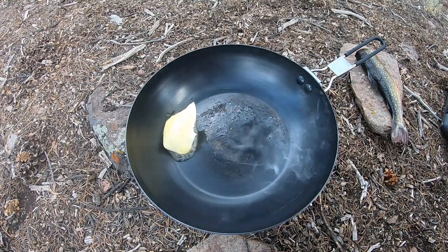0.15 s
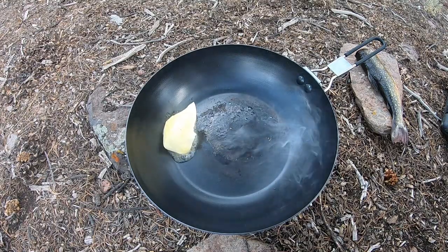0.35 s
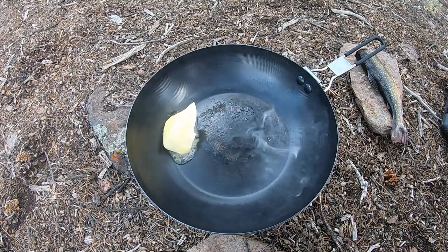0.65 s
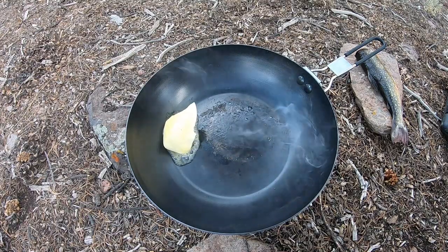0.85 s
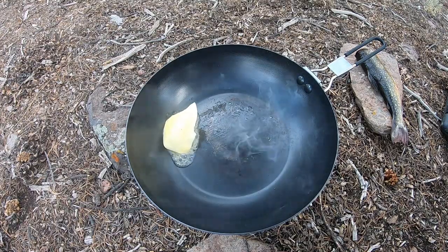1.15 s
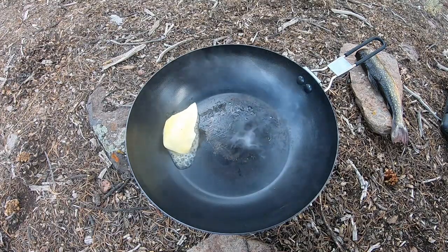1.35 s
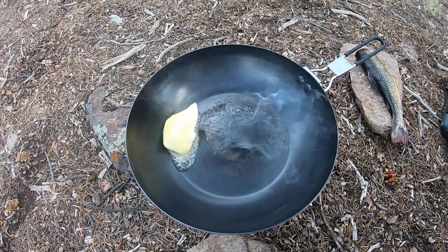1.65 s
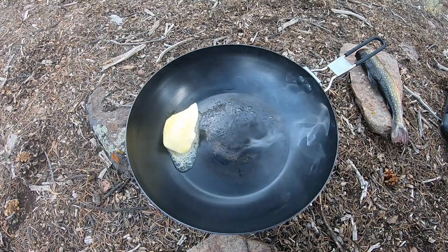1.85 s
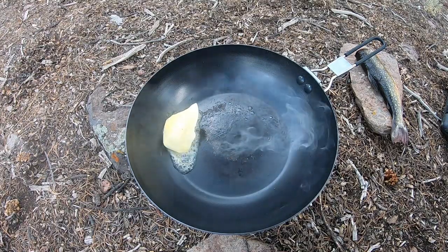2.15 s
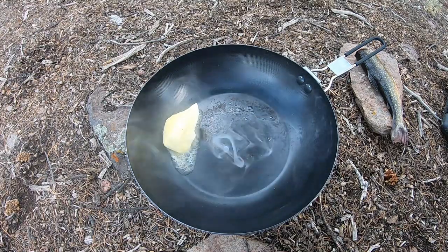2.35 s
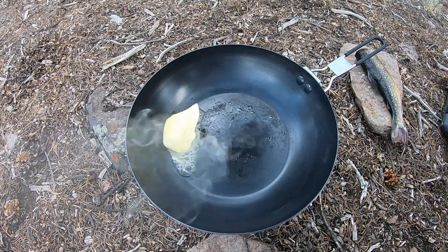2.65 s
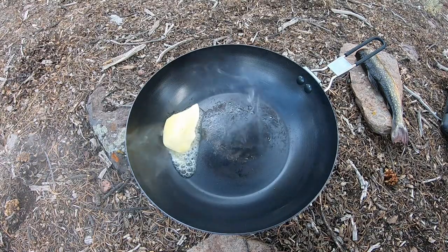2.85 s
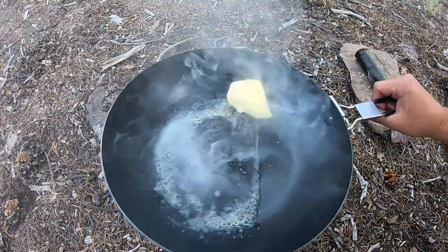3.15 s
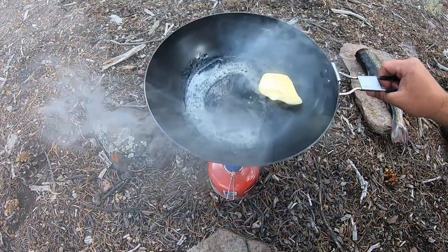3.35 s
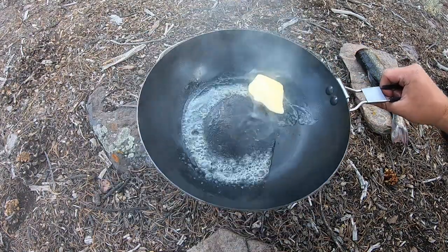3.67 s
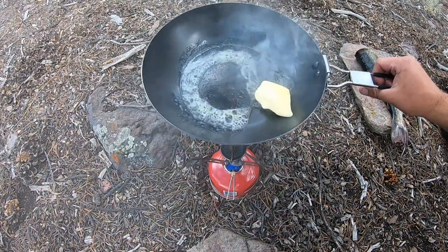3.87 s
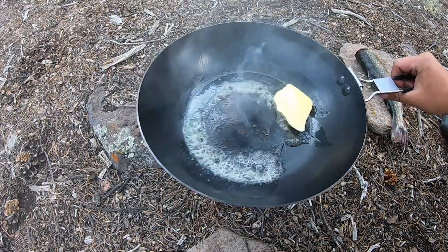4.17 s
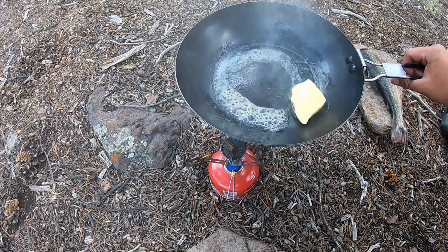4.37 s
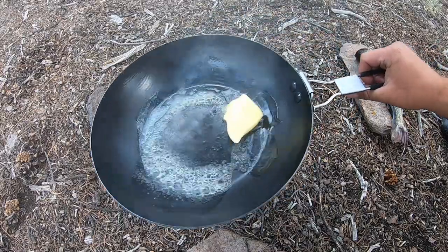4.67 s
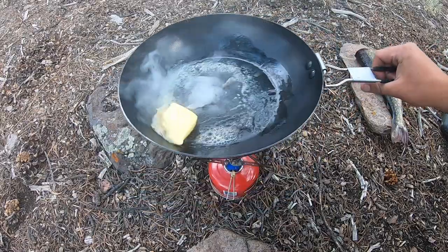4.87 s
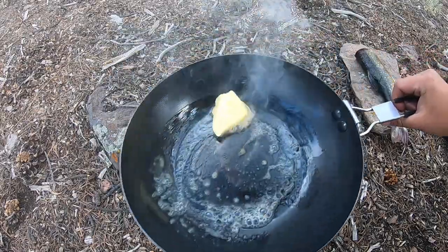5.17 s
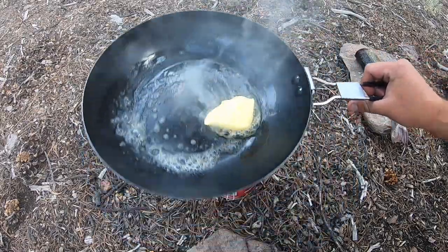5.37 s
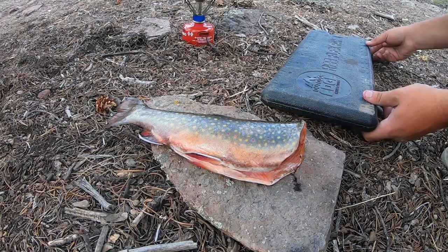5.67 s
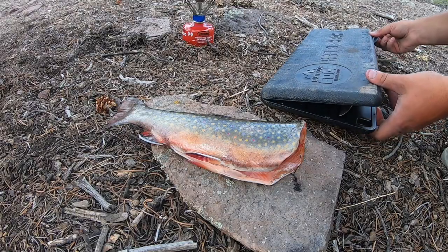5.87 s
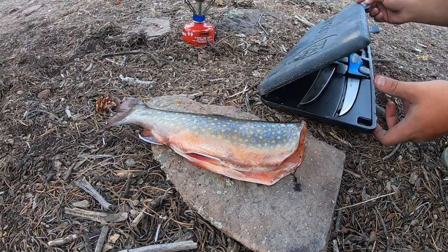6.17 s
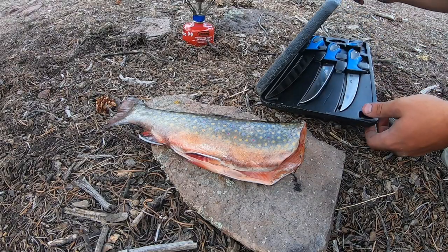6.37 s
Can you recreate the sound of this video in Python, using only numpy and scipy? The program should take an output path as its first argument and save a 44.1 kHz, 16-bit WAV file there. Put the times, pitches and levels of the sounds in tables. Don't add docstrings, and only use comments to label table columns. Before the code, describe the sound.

Butter sizzles crisply in a steel pan outdoors, foams louder as it is swirled, knocks and clangs on a burner, then a case snaps open over distant frying.

```python
import sys
import numpy as np
from scipy import signal
from scipy.io import wavfile

SR = 44100
rng = np.random.default_rng(int(sys.argv[2]) if len(sys.argv) > 2 else 0)


def generate_wav(signal):
    frames = np.transpose(np.atleast_2d(signal))
    scaled = np.clip(frames, -1, 1) * 32767
    pcm = np.round(scaled).astype(np.int16)
    wavfile.write(sys.argv[1], SR, pcm)


def level_to_linear(level):
    exponent = np.asarray(level, float) / 20
    return 10 ** exponent


N = 287281
LIFT_S, CUT_S = 2.962, 5.677


def rms_one(x):
    return x / np.sqrt(np.mean(x ** 2) + 1e-20)


def in_time(rows):
    s, *columns = np.transpose(rows)
    return [np.interp(np.arange(N) / SR, s, c) for c in columns]


def at_hz(points, hz):
    f, db = np.transpose(points)
    return np.interp(np.log(hz), np.log(f), db)


def drift(rate):
    r = np.exp(-80 * np.pi * rate / SR)
    noise = rng.standard_normal(N // 40 + 2002)
    slow = signal.lfilter([1], [1, -2 * r, r * r], noise)[2000:]
    return np.interp(np.arange(N) / 40, np.arange(len(slow)), rms_one(slow))


def band(x, low_hz, high_hz, order=2):
    return signal.sosfilt(signal.butter(order, [low_hz, high_hz], "band", fs=SR, output="sos"), x)


def fade(at_s, length_s):
    return np.clip((np.arange(N) / SR - at_s) / length_s + .5, 0, 1)


def ring(clicks, hz, t60):
    r, w = level_to_linear(-60 / (t60 * SR)), 2 * np.pi * hz / SR
    return signal.lfilter([0, np.sin(w)], [1, -2 * r * np.cos(w), r * r], clicks + 1e-18)


def struck(modes, hits):
    at, out = np.array([round(s * SR) for s, db in hits]), np.zeros(N)
    first = at.min()
    for hz, level_db, t60 in modes:
        clicks = np.zeros(N - first)
        clicks[at - first] = level_to_linear(np.array(hits)[:, 1] + level_db) * rng.choice([-1, 1], len(at))
        out[first:] += ring(clicks, hz, t60)
    return out


def contact_noise(at_s, level_db, db_per_s):
    since = np.arange(N) / SR - at_s
    return level_to_linear(level_db - db_per_s * np.maximum(since, 0)) * (since > 0) * rng.standard_normal(N)


# (t/s, level/dB)
BREEZE = [(0.0, -26), (0.35, -23), (0.55, -35), (0.8, -28), (1.6, -28), (2.1, -36), (2.9, -35), (3.1, -21),
          (3.72, -25), (3.95, -37), (4.92, -34), (5.15, -47), (5.8, -59), (6.51, -54)]
# (t/s, peak level/dB, length/s, sharpness/dB)
GUSTS = [(0.08, -27, .07, -14), (0.31, -20, .1, -5), (0.58, -28, .05, -13), (0.74, -44, .05, -10),
         (0.92, -24, .08, -22), (1.08, -31, .05, -11), (1.31, -33, .06, -14), (1.51, -26, .06, -10),
         (1.66, -34, .04, -14), (1.84, -35, .07, -24), (2.02, -45, .05, -14), (3.04, -29, .08, -7),
         (3.3, -37, .07, -7), (3.47, -40, .05, -4), (3.73, -36, .08, -14), (4.39, -52, .07, -16),
         (4.74, -46, .09, -17), (5.05, -56, .1, -3)]


def wind():
    white, out, t = rng.standard_normal((3, N + SR)), 0, np.arange(N) / SR
    breeze_db, = in_time(BREEZE)
    deep = level_to_linear(breeze_db - 18)
    upper = level_to_linear(-63 + .4 * (breeze_db - breeze_db.mean()))
    for s, db, length_s, sharp_db in GUSTS:
        part = slice(max(int((s - .4) * SR), 0), int((s + .4) * SR))
        shape = np.exp(-((t[part] - s) / length_s) ** 2)
        deep[part] += level_to_linear(db) * shape
        upper[part] += level_to_linear(db + sharp_db) * shape
    bands_hz = [(5, 15.9), (18, 31.9), (35, 56.6)]
    for noise, gain, (low_hz, high_hz) in zip(white, [level_to_linear(breeze_db), deep, upper], bands_hz):
        swings = band(band(noise, low_hz, high_hz), 0.78 * low_hz, 1.14 * high_hz)[SR:]
        out = out + gain * rms_one(swings)
    return out


# (f/Hz, level/dB)
FLAME_COLOUR = [(47, -30), (80, -7.5), (97, -8), (161, -5), (205, -8), (443, -8), (872, -16.5), (1000, -13),
                (1300, -50), (2200, -120)]
FLAME_NEAR_DB = [-52.5, -50]
FLAME_FAR_DB = [-53.5, -56]
SHIELD_DB = [0, -2.0]


def flame():
    edges, white, halves = np.geomspace(75, 1200, 13), rng.standard_normal((2, N)), np.zeros((2, N))
    for k, (low, high) in enumerate(zip(edges, edges[1:])):
        gain = level_to_linear(at_hz(FLAME_COLOUR, np.sqrt(low * high)) + 1.5 * drift(14.0))
        halves[k // 6] += gain * band(white[k % 2], low, high)
    away, lifted = fade(CUT_S, .1), fade(LIFT_S, .1)
    roar = 0
    for near_db, hid_db, far_db, half in zip(FLAME_NEAR_DB, SHIELD_DB, FLAME_FAR_DB, halves):
        level_db = 2 + near_db + (lifted - away) * hid_db + away * (far_db - near_db)
        roar = roar + level_to_linear(level_db) * rms_one(half)
    return roar


def jet():
    bared_s, flare_db, flare_s = 5.19, 4.0, .06
    since = np.maximum(np.arange(N) / SR - bared_s, 0)
    level_db = -43 + flare_db * np.exp(-since / flare_s)
    return level_to_linear(level_db) * fade(bared_s, .04) * rms_one(band(rng.standard_normal(N), 900, 3300))


# (f/Hz, level/dB, t60/s)
CASE = [(255, -31, .06), (415, -27, .03), (330, -34, .09), (890, -30, .015), (1580, -30, 0.007)]


def latch():
    snap_s = 5.7175
    hits = [(snap_s, .7), (snap_s + .03, -15.0), (snap_s + .05, -16.0)]
    return band(struck(CASE, hits) + contact_noise(snap_s, -25, 2200), 200, 2400)


# (f/Hz, level/dB, t60/s)
PAN_LOW = [(736, -25, 0.32), (834, -31, .12), (1380, -26, 0.034), (1760, -20, 0.03)]
# (f/Hz, level/dB, t60/s)
THUD = [(500, -23, .02), (620, -18, .025), (1050, -27, .015)]
# (t/s, level/dB)
KNOCKS = [
    (3.7335, -0.5),
    (5.626, -10.5),
    (4.74, -20.5),
    (5.22, -21),
]


def pan_knocks():
    return band(struck(PAN_LOW, KNOCKS) + struck(THUD, KNOCKS[:1]), 400, 4000, order=3)


# (f/Hz, level/dB, t60/s)
FIRST_PRONG = [(10300, -3, 0.034), (10650, -4.5, 0.04), (9470, -6.5, 0.052), (7280, -7.5, 0.057),
               (11450, -11, .06), (12700, -11, 0.044), (6130, -10, 0.071), (2210, -20, 0.027)]
SECOND_PRONG = [(4570, -5.5, 0.04), (7800, -11, .04), (10030, -9, .06), (3140, -19.5, 0.054),
                (10740, -10, 0.045)]
THIRD_PRONG = [(8500, -4, 0.066), (8300, -14, .04), (11500, -13, .05), (6500, -19, 0.054)]
PRONGS_S = 5.6241, 5.6263, 5.6295


def prong_clang():
    prongs = [FIRST_PRONG, SECOND_PRONG, THIRD_PRONG]
    clang = sum(struck(modes, [(s, 0)]) for modes, s in zip(prongs, PRONGS_S))
    crack = contact_noise(PRONGS_S[0], -8, 1600)
    drop_db = -10 * fade(5.637, .003)
    return band(clang + crack, 1900, 15000) * level_to_linear(drop_db)


def pops(rows, rise_turns, fall_turns, gain_db):
    out = np.zeros(N)
    for s, peak_db, hz in rows:
        turns = np.arange(400) / SR * hz
        shape = (1 - np.exp(-(turns / rise_turns) ** 2)) * np.exp(-turns / fall_turns)
        at = round(s * SR)
        burst = shape / shape.max() * np.sin(2 * np.pi * turns * (1 + 0.0032 * turns))
        out[at:at + 400] += level_to_linear(peak_db + gain_db) * burst[:N - at]
    return out


def lesser_pops(control, over_db, low_hz, high_hz, count):
    s, vigour, _ = np.transpose(control)
    when, size, pitch = rng.random((count, 3)).T
    at = s[0] + when * (s[-1] - s[0])
    db = np.interp(at, s, vigour) + over_db + 2.5 * (2 * size - 1)
    return list(zip(at, db, low_hz * (high_hz / low_hz) ** pitch))


FOLLOWS_VIGOUR = [.75, 1.01, .99, 1.01]
FOLLOWS_COARSENESS = [.3, .65, -.4, -.4]


def by_size(control, sizes_db):
    vigour, coarse = in_time(control)
    mean_db = np.mean(control, axis=0)[1]
    return [mean_db + db + a * (vigour - mean_db) + b * coarse
            for db, a, b in zip(sizes_db, FOLLOWS_VIGOUR, FOLLOWS_COARSENESS)]


def swell(clicks, hz, cycles):
    wide, narrow = level_to_linear(-130 * hz / (cycles * SR)), level_to_linear(-60 * hz / (cycles * SR))
    w = 2 * np.pi * hz / SR
    sections = [[(1 - r * r) / 2, 0, (r * r - 1) / 2, 1, -2 * r * np.cos(w), r * r] for r in (wide, narrow)]
    return signal.sosfilt(sections, clicks + 1e-18)


SIZE_EDGES_HZ = [650, 2800, 5600, 9000, 16200]
STEAM_DB = [3.0, -1.5, -.7, .4]


def foam(levels, sizes_db, colour, per_s, spread_db, clump_db, cycles, small_bias):
    part = slice(max(int((levels[0][0] - .1) * SR), 0), min(int((levels[-1][0] + .1) * SR), N))
    count = part.stop - part.start
    pitches = np.geomspace(SIZE_EDGES_HZ[:-1], SIZE_EDGES_HZ[1:], 25)[1::2].T
    share = pitches ** small_bias / np.sum(pitches ** small_bias)
    dealt = np.searchsorted(np.cumsum(share), rng.random(count))
    sizes = level_to_linear(spread_db * np.minimum(rng.exponential(1, count), 5)) * rng.choice([-1, 1], count)
    bursts = rms_one(sizes * (rng.random(count) < per_s / SR))
    clumps = level_to_linear(clump_db * (.5 * drift(10.0) + drift(50.0) + .8 * drift(180.0)))[part]
    steam, out = rng.standard_normal((3, count)), np.zeros(N)
    for c, level_db in enumerate(by_size(levels, sizes_db)):
        rings = 0
        for k, hz in enumerate(pitches[c]):
            own_bursts = bursts * (dealt == 12 * c + k) / np.sqrt(share[c, k])
            drive = own_bursts + level_to_linear(STEAM_DB[c]) * steam[k % 3]
            rings = rings + level_to_linear(at_hz(colour, hz)) * swell(clumps * drive, hz, cycles)
        out[part] += level_to_linear(level_db + .6 + clump_db * .4 * drift(24.6))[part] * rms_one(rings)
    return out


# (t/s, vigour level/dB, coarseness/dB)
FAR = [
    (5.69, -41.5, 0),
    (6.05, -43, 0),
    (6.2, -44, -1),
    (6.4, -41.5, 1),
    (6.51, -41.5, 0),
]
FAR_SIZES_DB = [-9, -2.5, -8.5, -11.5]
# (f/Hz, level/dB)
FAR_COLOUR = [(380, -44), (650, -14), (713, -13), (882, -12), (1080, -19), (1560, -11), (2150, -18.5),
              (2550, -8), (2760, -12), (3030, -4.5), (3410, -7.5), (4450, -5.5), (5080, -14.5), (9480, -18),
              (15500, -40.5)]


def far_foam():
    return foam(FAR, FAR_SIZES_DB, FAR_COLOUR, per_s=14000., spread_db=3.2, clump_db=.5,
                cycles=34., small_bias=.5)


# (t/s, peak level/dB, f/Hz)
FAR_POPS = [(5.7596, -28, 3700), (5.856, -31.5, 2570), (5.8854, -30, 4400), (5.8963, -28, 3700),
            (5.9487, -31, 9570), (5.9782, -29, 8630), (5.9965, -30, 3260), (6.02, -25.5, 2900),
            (6.1205, -29.5, 4000), (6.2126, -30, 4300), (6.2133, -28, 3240), (6.2333, -28, 3150),
            (6.2505, -29, 4370), (6.3762, -30, 3870), (6.4272, -29, 7010), (6.4334, -30, 4060),
            (6.4625, -24.5, 3800), (6.4853, -27, 3380)]


def far_pops():
    lesser = lesser_pops(FAR, 9.0, 3100, 9000, count=13)
    return pops(FAR_POPS + lesser, rise_turns=1.5, fall_turns=2.3, gain_db=0.5)


# (t/s, vigour level/dB, coarseness/dB)
RESTING = [
    (0.0, -29.5, -5),
    (0.3, -28.3, -4.2),
    (0.76, -27.2, -2),
    (1.43, -27.5, -1),
    (2.65, -25.3, 1.0),
    (2.94, -25.7, .7),
]
RESTING_SIZES_DB = [-19, -5.4, -4, -5.8]
# (f/Hz, level/dB)
RESTING_COLOUR = [(380, -47), (650, -21), (870, -30.5), (968, -23), (1210, -21.5), (1380, -18.5),
                  (2870, -16.5), (3800, 0.5), (5730, -1.5), (7470, -5), (8870, 0), (10000, -4.5),
                  (11100, -3.5), (15500, -15)]


def resting_foam():
    return foam(RESTING, RESTING_SIZES_DB, RESTING_COLOUR, per_s=12000., spread_db=3.4, clump_db=.75,
                cycles=28., small_bias=.6)


# (t/s, vigour level/dB, hold/s, coarseness/dB)
SWIRLS = [(2.93, -22.8, .17, -1), (3.18, -20.8, .13, 2.5), (3.36, -18.8, .19, 3.5), (3.66, -21, .14, 2.5),
          (3.87, -19.2, .16, 3.5), (4.13, -23, .19, 5.5), (4.35, -19.8, .04, 5), (4.41, -16.8, .085, -.5),
          (4.655, -23, .29, -1.5), (5.16, -23.5, .12, -.5), (5.57, -25, .1, 0)]


def swirling():
    rise_s, sag_db_per_s, drain_db_per_s = .05, 6.0, 90.0
    t = np.arange(LIFT_S, CUT_S, .005)
    power = level_to_linear(2 * -26.8) + 0 * t
    coarse = power * -3
    for s, db, hold_s, coarse_db in SWIRLS:
        since = t - s - rise_s
        loss_db = sag_db_per_s * np.maximum(since, 0) + drain_db_per_s * np.maximum(since - hold_s, 0)
        wash = (level_to_linear(db - loss_db) * np.clip(1 + since / rise_s, 0, 1)) ** 2
        power, coarse = power + wash, coarse + wash * coarse_db
    return np.transpose([t, 10 * np.log10(power), coarse / power])


SWIRLED_SIZES_DB = [-18.5, -5.2, -5, -4.5]
# (f/Hz, level/dB)
SWIRLED_COLOUR = [(380, -53), (650, -27), (732, -24.5), (1520, -24), (1900, -17.5), (2170, -23), (3190, -9),
                  (4000, -3), (4820, -0.5), (6630, -7), (11100, -4), (15500, -18)]


def swirled_foam():
    return foam(swirling(), SWIRLED_SIZES_DB, SWIRLED_COLOUR, per_s=18000., spread_db=3.0, clump_db=.5,
                cycles=30., small_bias=.6)


# (t/s, peak level/dB, f/Hz)
NEAR_POPS = [(0.0144, -12, 6940), (0.154, -12.5, 6300), (0.2563, -7.5, 8500), (0.2803, -15, 8810),
             (0.3531, -11, 7000), (0.4349, -11.5, 8370), (0.4738, -13, 6470), (0.7088, -12, 6500),
             (0.8011, -12, 11400), (0.855, -12.5, 7030), (0.8869, -15.5, 4250), (0.9278, -13, 6150),
             (1.2186, -13, 7890), (1.363, -13, 5200), (1.5065, -14, 5060), (1.956, -11.5, 5060),
             (2.0712, -11, 6200), (2.1076, -10, 6560), (2.2418, -9, 4650), (2.3431, -12.5, 4200),
             (2.3597, -12, 5110), (2.6419, -12.5, 5100), (2.6965, -13, 4780), (2.7596, -10, 5040),
             (2.9158, -13, 9680),
             (2.9736, -10, 5130), (3.022, -8.5, 3600), (3.0804, -8, 4660), (3.306, -9.5, 3400),
                (3.406, -8, 4750), (3.4451, -6, 4575), (3.6461, -7.5, 4500), (3.6877, -8.5, 4370),
                (3.734, -8, 4760), (3.9494, -6.5, 4490), (4.2193, -9, 4320), (4.257, -8, 4400),
                (4.3525, -8, 4330), (4.3869, -5.5, 4670), (4.4253, -2, 5090), (4.4453, -2, 4870),
                (4.4483, -8, 11000), (4.4595, -8, 10800), (4.5695, -4, 4850), (4.949, -9.5, 6100),
                (5.1462, -11, 4940), (5.1911, -12, 5070), (5.2275, -8, 11000), (5.3243, -8.5, 4800),
                (5.6525, -6, 4500)]


def near_pops():
    lesser_resting = lesser_pops(RESTING, 10.5, 4800, 9500, count=30)
    lesser_swirled = lesser_pops(swirling(), 10.5, 4000, 9000, count=12)
    rows = NEAR_POPS + lesser_resting + lesser_swirled
    return pops(rows, rise_turns=1.6, fall_turns=3.2, gain_db=-2.0)


def side_difference(middle):
    late = band(np.roll(middle, 90), 350, 2200, order=1) + level_to_linear(-12) * np.roll(middle, 60)
    return level_to_linear(-32 + 8.5 * drift(11.0)) * late


def scene():
    lifted, cut = fade(LIFT_S, 0.0068), fade(CUT_S, 0.0045)
    near = (1 - lifted) * resting_foam() + lifted * swirled_foam()
    near = near + pan_knocks() + prong_clang() + jet()
    middle = (1 - cut) * near + cut * far_foam()
    middle = middle + near_pops() + far_pops() + latch() + flame()
    return middle + side_difference(middle) * [[1], [-1]] + wind()


def band_limit(x):
    return signal.sosfilt(signal.butter(12, 15640, fs=SR, output="sos"), x)


def record(dry):
    return band_limit(np.clip(dry, -1, 1))


dry = scene()
out = record(dry)
generate_wav(out)
```